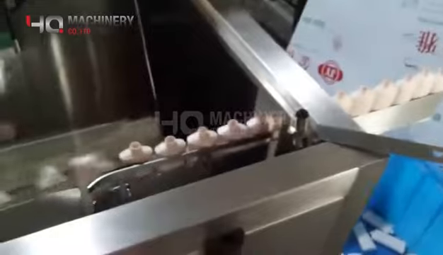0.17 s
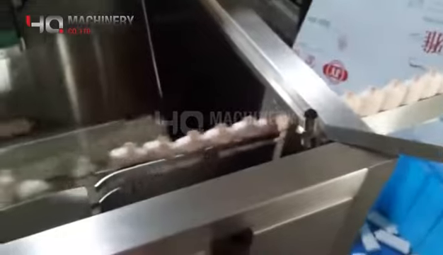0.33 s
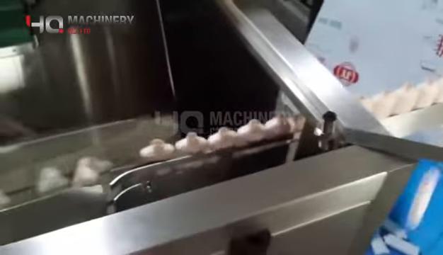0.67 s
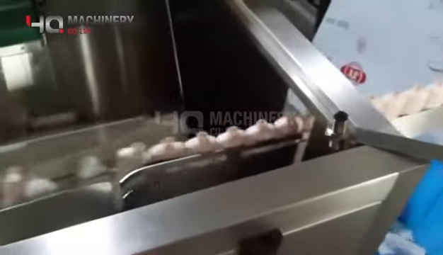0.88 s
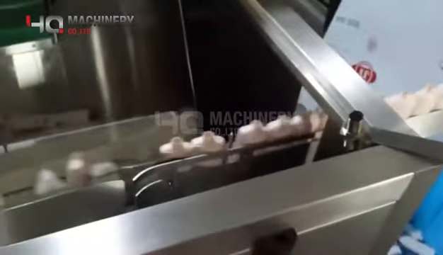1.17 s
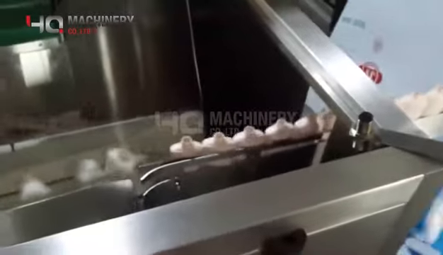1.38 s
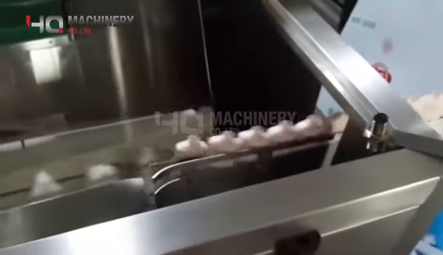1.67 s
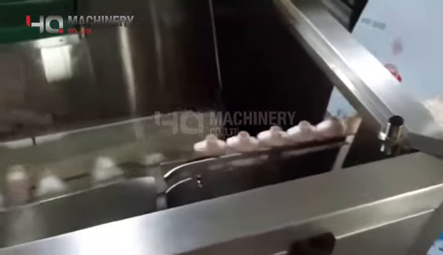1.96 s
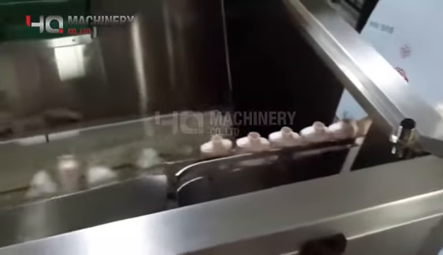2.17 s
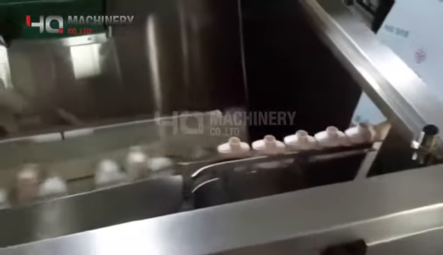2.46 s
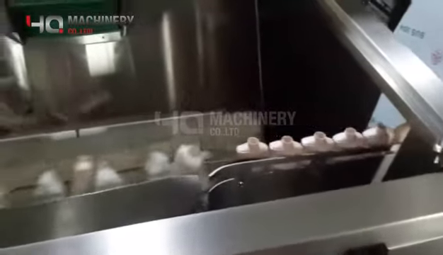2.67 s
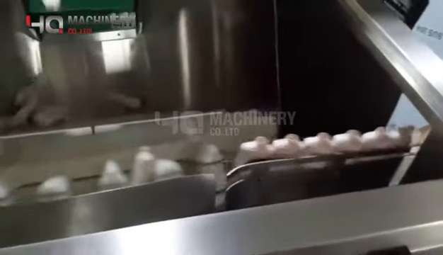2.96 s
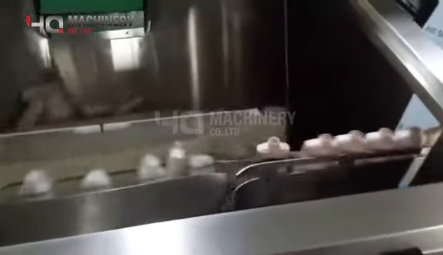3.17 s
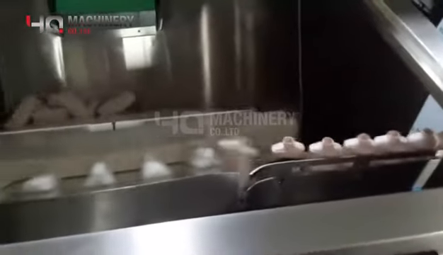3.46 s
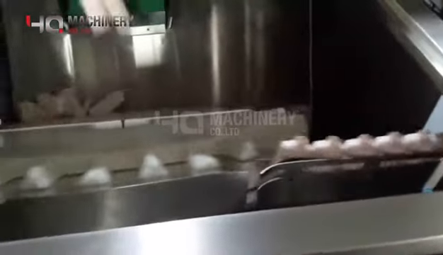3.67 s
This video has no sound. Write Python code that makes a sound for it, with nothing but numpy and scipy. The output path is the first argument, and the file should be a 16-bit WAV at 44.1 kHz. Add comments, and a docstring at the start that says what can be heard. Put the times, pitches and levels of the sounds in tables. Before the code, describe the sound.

A sorting machine runs loudly, empty plastic bottles rattling and knocking in its steel drum.

```python
"""Empty plastic bottles rattle and scrape in a sorting machine's steel drum, over air hiss and a drone.
Air jets spurt as bottles pass them; the drive hums in its housing and the turning drum rumbles.
Bottles knock on the drum wall, bump onto the heap, clack down flat and now and then thump the panels.
The machine is close by, in a hard factory hall. The sound is mono, with no top octave."""
import sys
import numpy as np
from scipy import signal
from scipy.fft import rfft, irfft
from scipy.io import wavfile
from scipy.ndimage import map_coordinates

SR = 44100
rng = np.random.default_rng(int(sys.argv[2]) if len(sys.argv) > 2 else 0)


def to_wav(sig):
    """Store sig (one row per channel, or 1-D mono) as 16-bit WAV at the path in sys.argv[1].

    Samples outside -1..1 are clipped; the rate is SR.
    """
    pcm = np.clip(np.atleast_2d(sig), -1, 1) * 32767
    pcm = np.round(pcm).astype(np.int16)
    wavfile.write(sys.argv[1], SR, pcm.T)  # frames by channels


N = 168462
TIME_S = np.arange(N) / SR


def undb(db):
    return 10 ** (np.asarray(db) / 20)


def unit(x):
    """Scale to rms 1."""
    return x / np.sqrt(np.mean(x ** 2) + 1e-18)


def noise(spectrum, samples=N):
    """Noise of rms 1, shaped by (Hz, dB) points."""
    hz, db = np.array(spectrum).T
    bins_hz = np.maximum(np.fft.rfftfreq(samples, 1 / SR), 1)
    gain = undb(np.interp(np.log(bins_hz), np.log(hz), db))
    return unit(irfft(rfft(rng.standard_normal(samples)) * gain, samples))


def wander(rate_hz):
    """Smooth random curve, spread near 1."""
    return map_coordinates(rng.standard_normal(size=2048), [TIME_S * rate_hz], order=3, mode="wrap")


def curve(points):
    return np.interp(TIME_S, *np.array(points).T)


def fade(t, t60_s):
    return np.exp(-np.log(1000) * t / t60_s)


def add(out, start_s, sound):
    i = max(int(start_s * SR), 0)
    n = max(min(len(sound), N - i), 0)
    out[i:i + n] += sound[:n]


# Bottle modes. Each row: multiple of the ring pitch, level in dB, T60 in seconds.
BOTTLE_RESONANCES = [(0.531,-7.5,0.055),(0.789,-4.5,0.045),(1.002,3,0.12),(1.126,-2.5,.055),(1.306,-8.5,.045)]
ATTACK_S = 0.002

def ring(pitch_hz):
    """A struck bottle's modes ring, slightly detuned at each blow."""
    t = np.arange(SR // 8) / SR
    out = np.zeros(len(t))
    for ratio, db, t60_s in BOTTLE_RESONANCES:
        hz = pitch_hz * ratio * (1 + 0.01 * rng.standard_normal())
        out += undb(db) * fade(t, t60_s) * np.sin(2 * np.pi * (hz * t + rng.random()))
    return out * (1 - np.exp(-t / ATTACK_S))


# Spectra of a bottle's shell and hollow body. Each row: frequency in Hz, relative density in dB.
SHELL_SPECTRUM = [(150,-39.5),(450,-21),(750,-1.5),(1100,-4.5),(1600,2),(2150,1),(2700,-7),(3500,-30.5)]
BODY_SPECTRUM = [(70,-46.5),(130,-37.5),(190,-11),(280,3.5),(400,0),(490,-2),(620,3),(850,-5.5),(1400,-34.5)]
# Tumbling strength of the heap. Each row: time in seconds, level in dB.
TUMBLE_LEVELS = [(0,-16),(.3,-18),(.62,-20),(.84,-20),(.92,-16.5),(1.28,-15),(1.36,-22.5),(1.51,-22),(1.62,-17.5),(1.9,-22),(2.03,-17),(2.19,-20),(2.3,-17),(2.58,-16.5),(2.68,-24.5),(2.77,-20.5),(2.86,-15.5),(2.96,-22),(3.05,-19.5),(3.18,-17.5),(3.4,-15),(3.82,-19)]

def rattle(hits_per_s=80, t60_s=0.1, low_hz=903.6, high_hz=2235, shell_db=-6, body_db=-7.5, ring_db=-9.5):
    """Many small collisions in the heap, each with its own short clatter and pitch."""
    energy, rings = np.zeros(N), np.zeros(N)
    for slot, (when, chance, pitch) in enumerate(rng.random((512, 3))):
        start_s = (slot + 2 * when) / hits_per_s
        size = undb(1.5 * min(-np.log(chance), 2))  # 0 to 3 dB
        add(energy, start_s, np.array([size ** 2]))
        if start_s < TIME_S[-1]:
            add(rings, start_s, size * ring(low_hz + pitch * (high_hz - low_hz)))
    power = signal.fftconvolve(energy, fade(TIME_S[:SR // 4], t60_s) ** 2)[:N]
    envelope = unit(np.sqrt(np.abs(power)))
    clatter = undb(shell_db) * noise(SHELL_SPECTRUM) + undb(body_db) * noise(BODY_SPECTRUM)
    return (envelope * clatter + undb(ring_db) * unit(rings)) * undb(curve(TUMBLE_LEVELS))


# Spectrum of hard contact, sliding or struck. Each row: frequency in Hz, relative density in dB.
CONTACT_SPECTRUM = [(500,-33.5),(1500,-8),(2600,6),(3600,4.5),(5000,2.5),(7500,-19.5)]
# Sliding strength. Each row: time in seconds, level in dB.
SLIDE_LEVELS = [(0,-26.5),(.6,-35.5),(1.101,-27.5),(1.8,-32),(2.27,-28.5),(2.73,-32.5),(3.05,-28.5),(3.3,-35.5),(3.7,-27.5)]

def scrape(judder_db=3.5, judder_hz=45.05):
    """Bottles slide over the steel in fits."""
    return noise(CONTACT_SPECTRUM) * undb(curve(SLIDE_LEVELS) + judder_db * wander(judder_hz))


# Jet spectrum. Each row: frequency in Hz, relative density in dB.
JET_SPECTRUM = [(1500,-37.5),(2500,-11.5),(3400,-11),(4600,-1.5),(5500,3),(6100,6.5),(6550,5),(6950,0),(7500,-10)]
# Spurts on passing bottles. Each row: centre in seconds, Gaussian sigma in seconds, relative level in dB.
JET_SPURTS = [(0.043,0.016,-18.5),(0.202,0.014,-18.5),(0.72,0.022,-18.5),(1.03,0.044,-18.5),(1.492,0.019,-20.5),(1.547,0.0058,-16.5),(1.655,0.045,-18),(1.943,0.0082,-18),(2.333,0.036,-19),(2.788,0.0052,-17.5),(3.03,0.04,-17.5),(3.238,0.041,-21.5),(3.706,0.074,-20)]
# Wall reflections. Each entry: delay in seconds.
WALL_DELAYS_S = [0.0025, .0052]
WALL_DB, WALL_DRIFT_S, WALL_DRIFT_HZ = -14, 0.00005, 2.98

def air_jets(hiss_db=-19.5, spurt_gain_db=1.5, flutter_db=1.17, flutter_hz=45.1):
    """Nozzles hiss and swell as bottles cross the jet; near steel walls colour the hiss."""
    swell = sum(undb(db + spurt_gain_db) * np.exp(-0.5 * ((TIME_S - centre_s) / sigma_s) ** 2)
                for centre_s, sigma_s, db in JET_SPURTS)
    jet = noise(JET_SPECTRUM)
    echoes = np.zeros(N)
    for delay_s in WALL_DELAYS_S:
        delayed_s = TIME_S - delay_s - WALL_DRIFT_S * wander(WALL_DRIFT_HZ)
        echoes += map_coordinates(jet, [delayed_s * SR], order=3, mode="mirror")
    envelope = np.hypot(undb(hiss_db), swell) * undb(flutter_db * wander(flutter_hz))
    return unit(jet + undb(WALL_DB) * echoes) * envelope


# Drive spectrum. Each row: frequency in Hz, relative density in dB.
DRIVE_SPECTRUM = [(20,-9),(45,-26),(130,-20.5),(200,-16.5),(270,-11.5),(480,6),(1000,0.5),(2000,3),(3200,-26.5)]
# Steel housing resonances. Each row: frequency in Hz, width in Hz, level in dB at mean load.
HOUSING_MODES = [(269.7,33.6,-27),(385,55,-31),(643.8,20,-29.5),(1506,30,-37)]

def drive(drone_db=-26.5, shake_db=4, shake_hz=68.8, lowest_mode_flex_s=0.0003, flex_hz=11, load_share=0.59):
    """The drive drones and shakes the flexing housing, harder while the heap tumbles."""
    out = undb(drone_db) * noise(DRIVE_SPECTRUM)
    lowest_hz = HOUSING_MODES[0][0]
    for hz, width_hz, db in HOUSING_MODES:
        b, a = signal.iirpeak(hz, hz / (1.58 * width_hz), fs=SR)  # two passes narrow it to width_hz
        shake = rng.standard_normal(N) * undb(shake_db * wander(shake_hz))
        mode = signal.lfilter(b, a, signal.lfilter(b, a, shake))
        flexed_s = TIME_S + lowest_mode_flex_s * lowest_hz / hz * wander(flex_hz)
        out += undb(db) * unit(map_coordinates(mode, [flexed_s * SR], order=1, mode="mirror"))
    tumble_db = curve(TUMBLE_LEVELS)
    return out * undb(load_share * (tumble_db - tumble_db.mean()))


# Drum spectrum. Each row: frequency in Hz, relative density in dB.
DRUM_SPECTRUM = [(30,-24),(55,-26.5),(80,-11),(118,-1.5),(140,-5),(185,3.5),(240,6.5),(400,-19)]
# Rumble strength. Each row: time in seconds, level in dB.
DRUM_LEVELS = [(0,-33.5),(.72,-49),(.93,-31.5),(2.15,-27.5),(2.419,-37),(2.85,-30.5),(3.45,-34.5),(3.7,-30)]

def rumble(shake_db=1.5, shake_hz=21.57):
    """The turning drum rumbles unevenly."""
    return undb(curve(DRUM_LEVELS) + shake_db * wander(shake_hz)) * noise(DRUM_SPECTRUM)


def burst(spectrum, t60_s, attack_s=ATTACK_S, contact_s=0.004, contact_gain=0.6):
    """Dense modes struck at once: a sharp contact above a fading tail."""
    t = np.arange(SR // 4) / SR
    contact = 1 + contact_gain * np.exp(-t / contact_s)
    envelope = (1 - np.exp(-t / attack_s)) * fade(t, t60_s) * contact
    return unit(noise(spectrum, len(t)) * envelope) * np.sqrt(np.mean(envelope ** 2))


def hollow_body(db):
    """A bottle's hollow body answers a blow."""
    return undb(db) * burst(BODY_SPECTRUM, t60_s=0.13, attack_s=0.0047)


def crack(db, gain_db=1.5):
    """A hard contact cracks brightly."""
    return undb(db + gain_db) * burst(CONTACT_SPECTRUM, t60_s=0.12)


# Knocks on the drum wall. Each row: start in seconds, relative shell and ring level in dB,
# ring pitch in Hz, body level in dB, relative crack level in dB.
WALL_KNOCKS = [(0.188, -15.5, 2080, -18, -26.5), (0.4354, -6, 1503, -20, -41),
               (0.4494, -5, 812, -30.5, -42), (0.5822, -9, 1565, -36, -32.5),
               (0.9278, -2.5, 1330, -13, -22.5), (0.9717, -5.5, 1520, -10.5, -25.5),
               (1.040, -6, 995, -14.5, -31), (1.060, -6.5, 1583, -19, -20.5),
               (1.104, -15, 1660, -20.5, -33), (1.118, -7.5, 710, -25, -28), (1.5698, -6, 1497, -12.5, -28),
               (1.9939, -6, 1624, -23, -28.5), (2.0207, -8.5, 2080, -15.5, -18),
               (2.0892, -2, 2120, -18.5, -28.5), (2.157, -4, 2020, -19, -32),
               (2.2237, -6.5, 891, -8.5, -18.5), (2.2886, -7, 1603, -17, -29),
               (2.3667, -2.5, 1667, -27.5, -39.5), (2.7047, -6.5, 1367, -23.5, -34.5),
               (2.8105, -3, 1903, -24, -28), (2.8237, -1, 1734, -21, -35),
               (2.9781, -3.5, 1942, -21.5, -24.5), (3.0198, -5.5, 1696, -17, -24.5),
               (3.1015, -7, 2196, -35, -20.5), (3.2244, -7, 1460, -12, -32), (3.259, -7, 1650, -22.5, -32),
               (3.3016, 1.5, 1562, -19, -34), (3.3195, -4.5, 2040, -22.5, -34), (3.338, -3, 1524, -15, -30),
               (3.363, -7.5, 1850, -26, -21.5), (3.5069, -4, 2046, -10, -16.5)]

def knocks(shell_gain_db=-9.5, ring_gain_db=-9):
    """Bottles strike steel: the shell clatters and rings, the body answers, the contact cracks."""
    out = np.zeros(N)
    for start_s, db, pitch_hz, body_db, crack_db in WALL_KNOCKS:
        add(out, start_s, undb(db + ring_gain_db) * ring(pitch_hz))
        shell = undb(db + shell_gain_db) * burst(SHELL_SPECTRUM, t60_s=0.15)
        add(out, start_s, shell + hollow_body(body_db) + crack(crack_db))
    return out


# Drops on the heap. Each row: start in seconds, level in dB.
HEAP_BUMPS = [(0.861,-11.5),(.884,-8.5),(.909,-7.5),(1.014,-12.5),(2.503,-11.5),(2.866,-17),(2.9,-11.5),(3.575,-14.5),(3.718,-13.5)]

def bumps():
    """Bottles drop softly on the heap, so only their hollow bodies sound."""
    out = np.zeros(N)
    for start_s, db in HEAP_BUMPS:
        add(out, start_s, hollow_body(db))
    return out


# Flat landings. Each row: start in seconds, relative level in dB, centre in Hz, relative crack level in dB.
FLAT_LANDINGS = [(0.862, -8.5, 1520, -22), (0.8917, -13, 2200, -14.5), (1.395, -14, 1100, -27),
                 (1.408, -11.5, 1010, -22), (1.4733, -15, 1700, -23.5), (1.5383, -9.5, 960, -14),
                 (1.8319, -6.5, 1160, -20.5), (1.941, -16, 1750, -14.5), (2.2026, -8.5, 1800, -14.5),
                 (2.506, -9.5, 1650, -22), (2.6261, -14.5, 1900, -19.5), (2.7802, -7.5, 1490, -35),
                 (3.3855, -10.5, 1200, -20.5), (3.444, -12, 1400, -17.5), (3.57, -13.5, 1800, -13),
                 (3.707, -10.5, 1490, -23)]
# Clack spectrum. Each row: multiple of the centre frequency, relative density in dB.
CLACK_SPECTRUM = [(.2,-24),(.4,-7),(.85,-1),(1.45,0),(3.201,-29)]

def clacks(first_end_db=-2, second_end_db=-4, second_end_lag_s=0.006):
    """Bottles land flat, one end just after the other: a dry, broad clack without ring."""
    out = np.zeros(N)
    for start_s, db, centre_hz, crack_db in FLAT_LANDINGS:
        spectrum = [(ratio * centre_hz, density_db) for ratio, density_db in CLACK_SPECTRUM]
        for lag_s, end_db in (0, first_end_db), (second_end_lag_s, second_end_db):
            add(out, start_s + lag_s, undb(db + end_db) * burst(spectrum, t60_s=0.08, attack_s=0.001))
        add(out, start_s, crack(crack_db))
    return out


# Blows on the panels. Each row: start in seconds, relative level in dB.
PANEL_THUMPS = [(0.895,-25),(0.939,-20.5),(1.537,-16),(2.225,-20.5),(3.233,-20.5),(3.571,-22),(3.722,-17),(3.75,-19.5)]
# Panel spectrum. Each row: frequency in Hz, relative density in dB.
PANEL_SPECTRUM = [(45,-33),(90,-12),(130,-5),(180,4.5),(250,-11),(450,-9),(1200,-41)]

def thumps(gain_db=6.5):
    """Falling bottles set the drum's sheet panels booming."""
    out = np.zeros(N)
    for start_s, db in PANEL_THUMPS:
        add(out, start_s, undb(db + gain_db) * burst(PANEL_SPECTRUM, t60_s=0.098, attack_s=0.0071))
    return out


def hall(x, echo_db=-9.5, t60_s=0.51, delay_s=0.006):
    """The hard factory hall adds a diffuse echo."""
    t = np.arange(SR) / SR
    tail = rng.standard_normal(SR) * fade(t, t60_s) * (t > delay_s)
    return x + undb(echo_db) * signal.fftconvolve(x, tail / np.linalg.norm(tail))[:N]


def scene():
    bottles = knocks() + clacks() + bumps() + thumps() + rattle() + scrape()
    mono = hall(bottles) + air_jets() + drive() + rumble()
    return np.array([mono, mono])


def record(dry):
    """Peaks near full scale are rounded and the top octave is cut."""
    top_hz = 7500
    rounded = dry / (1 + dry ** 6) ** (1 / 6)
    return signal.sosfiltfilt(signal.ellip(10, 0.1, 60, top_hz, fs=SR, output="sos"), rounded)


dry = scene()
out = record(dry)
to_wav(out)
```